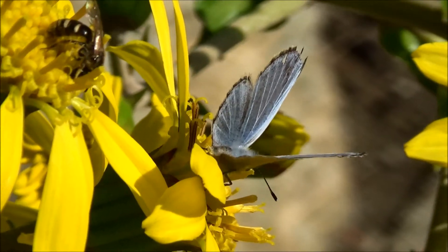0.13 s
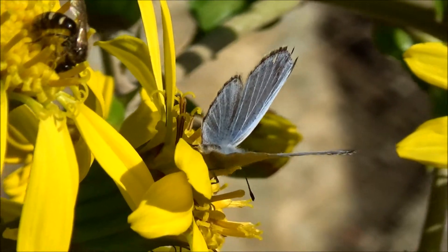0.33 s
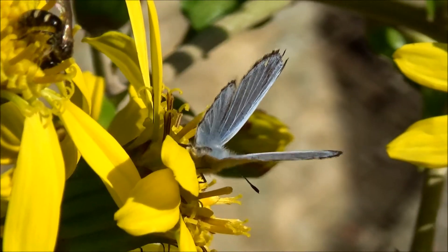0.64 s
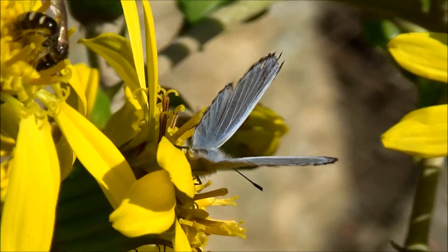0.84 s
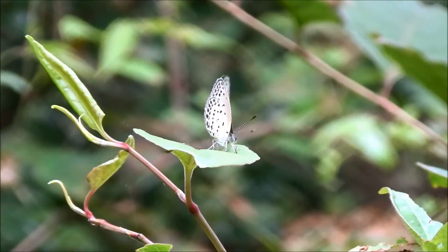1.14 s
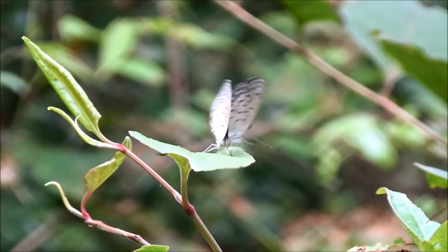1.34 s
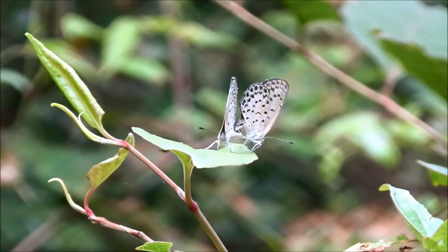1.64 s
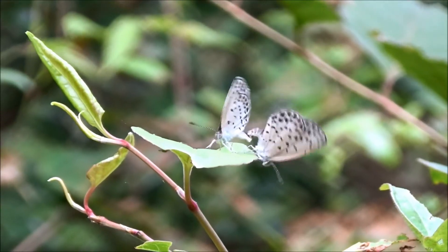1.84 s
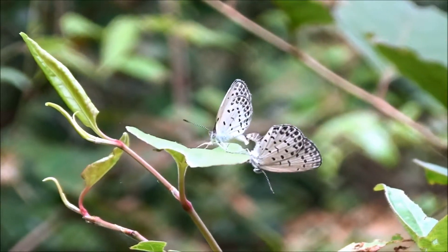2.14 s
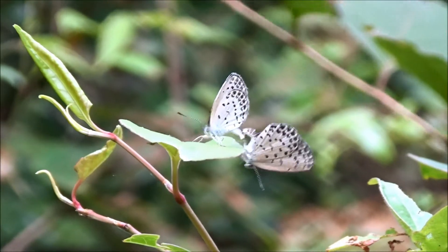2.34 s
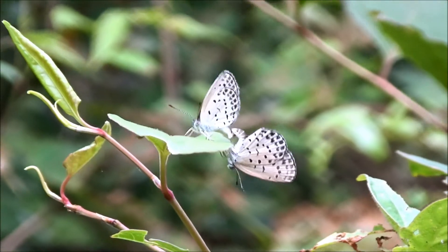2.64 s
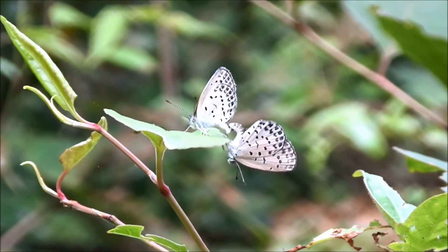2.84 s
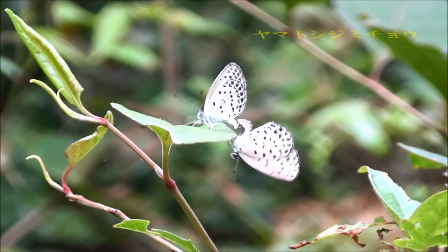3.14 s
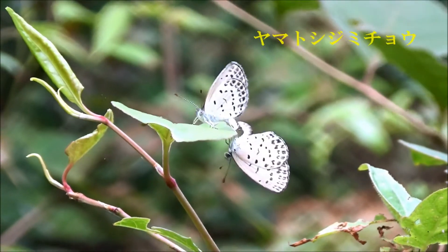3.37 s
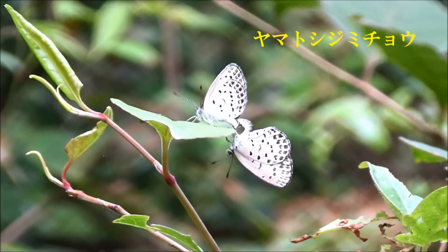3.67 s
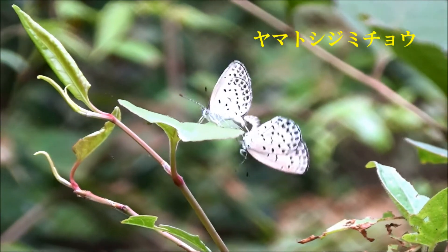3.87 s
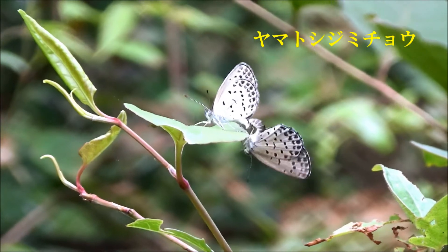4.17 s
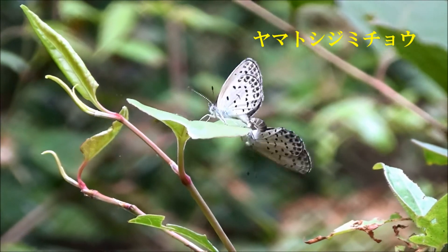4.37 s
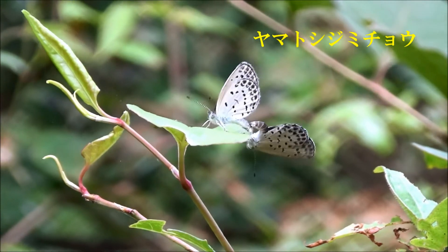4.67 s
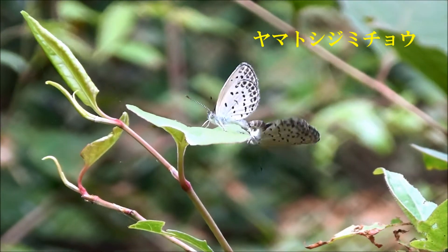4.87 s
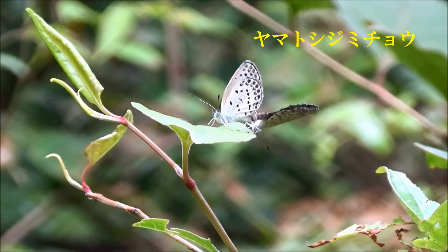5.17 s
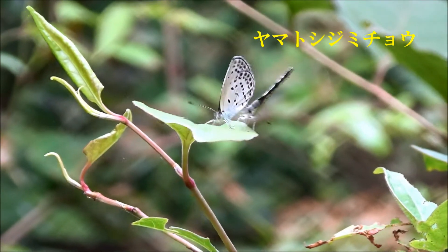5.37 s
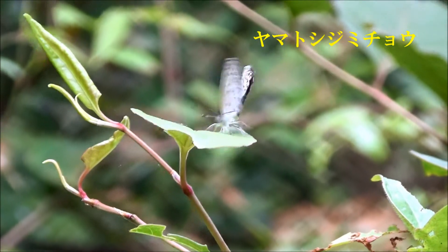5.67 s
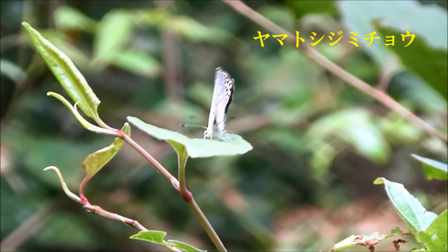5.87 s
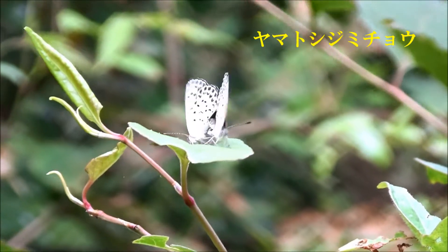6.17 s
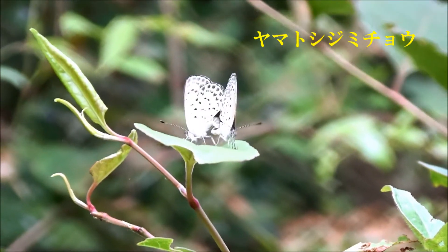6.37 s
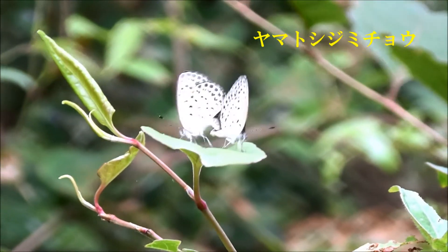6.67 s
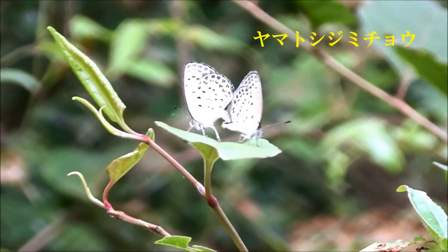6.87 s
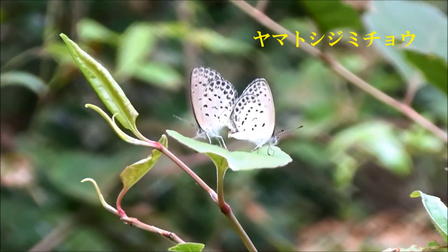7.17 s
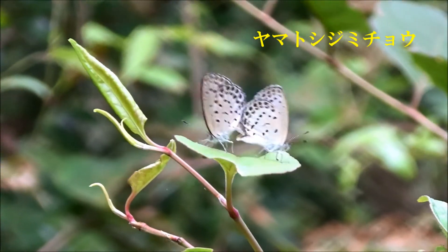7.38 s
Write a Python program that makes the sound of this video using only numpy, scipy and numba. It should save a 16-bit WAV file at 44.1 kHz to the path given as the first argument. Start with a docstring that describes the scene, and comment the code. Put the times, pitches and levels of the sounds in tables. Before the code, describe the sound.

Two natural places joined by a cut. First a soft, distant meadow with traffic hum, crickets, a single close chirp and a tiny bird whistle. Then a woodland insect drone gradually grows, a near cicada buzzing in fast pulses before a steady high chorus. Rumble from passing vehicles lies beneath. Close to the microphone are light regular camera ticks, a hard click near the middle and smaller ticks afterward.

```python
"""Two places outdoors, cut together. It opens on a second of quiet meadow: far traffic as shaped noise, far
crickets as narrow noise, one near cricket as a gliding tone, then a grainy rustle and a far bird's whistle.
A slow fade then opens on a wood: a near cicada throbs, its clicks ringing moving resonances, over a noise band
of far cicadas and the noise of traffic and leaves. At the microphone the camera ticks faintly; two knocks, then
two strong narrow-band ticks, ring its body modes, and the hardest knock pulls the gain control down."""
import sys
import numpy as np
from scipy import signal
from scipy.fft import rfft, irfft, next_fast_len
from scipy.io import wavfile
from scipy.ndimage import uniform_filter1d, minimum_filter1d
from numba import njit

SR = 44100
rng = np.random.default_rng(int(sys.argv[2]) if len(sys.argv) > 2 else 0)


def level_to_linear(level):
    """Convert decibel levels to linear amplitude factors, elementwise."""
    exponent = np.asarray(level, float) / 20
    return 10 ** exponent


def log_audio(samples):
    """Write samples as a 16-bit WAV file to the path given in sys.argv[1]."""
    # one column per channel
    frames = np.atleast_2d(samples).T
    # limit to full scale, then quantise
    limited = np.clip(frames, -1, 1)
    pcm = np.round(limited * 32767).astype(np.int16)
    wavfile.write(sys.argv[1], SR, pcm)


N = 331191
T = np.arange(N) / SR


def curve(table):
    """Columns of a table as signals gliding in time."""
    s, *columns = np.transpose(table)
    return [np.interp(T, s, c) for c in columns]


def held(table):
    """Columns of a table as steps in time."""
    s, *columns = np.transpose(table)
    return [c[np.searchsorted(s, T, side="right") - 1] for c in columns]


def noise():
    """White noise of rms 1."""
    return rng.standard_normal(N)


def level(x, db):
    """Scale to an rms level."""
    return x * level_to_linear(db) / np.sqrt(np.mean(x ** 2))


def colour(x, points):
    """Shape a spectrum by (Hz, dB) points, then set its rms to 1."""
    hz, db = np.transpose(points)
    size = next_fast_len(N)
    f = np.maximum(np.arange(size // 2 + 1) * SR / size, 1)
    weight = level_to_linear(np.interp(np.log(f), np.log(hz), db))
    return level(irfft(rfft(x, size) * weight, size)[:N], 0)


def walk(rate):
    """Random levels held 1 / rate s and slewed twice; spread near 1."""
    k = int(SR / rate)
    steps = np.repeat(rng.standard_normal(N // k + 1), k)
    return 1.3 * uniform_filter1d(uniform_filter1d(steps, k), k)[:N]


def bump(s, length):
    """A smooth Gaussian swell in time."""
    return np.exp(-.5 * ((T - s) / length) ** 2)


def note(s, length, edge):
    """Rise, hold, fall."""
    return np.clip(np.minimum(T - s, s + length - T) / edge, 0, 1)


@njit
def svf(x, hz, width):
    """Band-pass whose centre moves every sample."""
    y, b, l = np.empty(len(x)), 0., 0.
    for i in range(len(x)):
        g, k = np.tan(np.pi * hz[i] / SR), width / hz[i]
        v = (b + g * (x[i] - l)) / (1 + g * (g + k))
        b, l, y[i] = 2 * v - b, l + 2 * g * v, k * v
    return y


def ground_echo(x, db):
    """One inverted early reflection, 2.595 ms late, combs the spectrum."""
    return x - level_to_linear(db) * np.interp(T - .002595, T, x)


# open meadow with far traffic, spectrum at the microphone: freq_hz, density_db (relative, dB per Hz)
MEADOW_SPECTRUM = [(15, -40), (25, -25.5), (152, 0.5), (260, -11.5), (583, -13), (850, -19.5),
                   (1300, -11.5), (2000, -21.5), (3700, -24), (5000, -21.5), (9000, -26), (15600, -28.5)]
MEADOW_DB = -63


def meadow_air():
    """Far traffic rumble over open ground: shaped noise whose level wanders."""
    return colour(noise(), MEADOW_SPECTRUM) * level_to_linear(MEADOW_DB + 1.0 * walk(7.6))


# chirps from across the meadow: start_s, level_db (before the common lift), length_s
FAR_CHIRPS = [(-.02, -75.5, 0.063), (0.073, -76, 0.06513), (.375, -81.5, 0.0274), (0.504, -73.5, .05),
              (0.576, -73.5, .055), (.65, -82.5, .11), (0.853, -79, 0.095)]
FAR_BED_DB, FAR_LIFT_DB = -80.5, 4.112  # the bed too is before the lift


def far_crickets():
    """Distance leaves a narrow noise of wandering pitch: chirps over a steady bed."""
    song = level(svf(noise(), 6050 + 120 * walk(12), 260.), FAR_LIFT_DB)
    chirps = sum(level_to_linear(db) * note(s, length, 0.01307) for s, db, length in FAR_CHIRPS)
    return song * (level_to_linear(FAR_BED_DB) + chirps)


# wing strokes close to the microphone: centre_s, level_db (rms of the tone at the top), spread_s
CRICKET_STROKES = [(.437, -58, 0.000884), (.441, -47.5, 0.001235), (0.451, -39, 0.0037),
                   (.463, -41, 0.004117), (0.478, -50.5, .0025), (0.492, -57, .003)]
# the pitch settles downward through the chirp, echoes die away
CHIRP_S, CHIRP_HZ, CHIRP_DROP_HZ, CHIRP_SETTLE_S = 0.439, 5963.4, 330, .01
ECHO_S, ECHO_DB, ECHO_DB_A_SECOND = .47, -59, -170


def near_cricket():
    """Wing strokes sound a falling tone with a faint octave; scattered echoes blur it into narrow noise."""
    hz = CHIRP_HZ + CHIRP_DROP_HZ * np.exp(-np.maximum(T - CHIRP_S, 0) / CHIRP_SETTLE_S)
    phase = 2 * np.pi * np.cumsum(hz) / SR
    strokes = sum(level_to_linear(db) * bump(s, length) for s, db, length in CRICKET_STROKES)
    chirp = np.sqrt(2) * strokes * (np.sin(phase) + level_to_linear(-35) * np.sin(2 * phase))
    decay = level_to_linear(ECHO_DB + ECHO_DB_A_SECOND * np.abs(T - ECHO_S))
    onset = np.clip((T - ECHO_S) / .012, 0, 1)
    return chirp + level(svf(noise(), hz, 240.0), 0) * decay * onset


RUSTLE_S, RUSTLE_DB, RUSTLE_RISE_S, RUSTLE_FALL_S = 0.47821, -63.5, .02, 0.05  # level before the envelope


def rustle():
    """Noise in grains of uneven strength, rising quickly and dying away."""
    since = np.maximum(T - RUSTLE_S, 0)
    grains = noise() * level_to_linear(2.2 * walk(300))
    shaped = colour(grains, [(700, -34), (1400, -3.0), (2800, 2), (4500, -12), (8000, -40)])
    envelope = 2 * (1 - np.exp(-since / RUSTLE_RISE_S)) * np.exp(-since / RUSTLE_FALL_S)
    return shaped * level_to_linear(RUSTLE_DB) * envelope


# whistled notes from far off: start_s, level_db, length_s; the first slides up to the pitch
BIRD_NOTES = [(.695, -75, 0.0823), (0.767, -72, 0.0592), (.835, -72.5, 0.0746)]
BIRD_HZ, BIRD_SLIDE_HZ, BIRD_SLIDE_S = 3760, 700, .012


def far_bird():
    """A thin whistle: noise through a narrow band at the note's pitch."""
    hz = BIRD_HZ - BIRD_SLIDE_HZ * np.exp(-np.maximum(T - BIRD_NOTES[0][0], 0) / BIRD_SLIDE_S)
    notes = sum(level_to_linear(db) * note(s, length, 0.00925) for s, db, length in BIRD_NOTES)
    return level(svf(noise(), hz, 120.), 0) * notes


# near cicada in the wood: time_s, effort_db, click_rate_hz (mean, tymbal clicks), swing (of the abdomen, 0-1)
SONG = [(1, -2, 306, 0.63), (1.8, -1, 306, 0.4), (2.6, -1, 375, .4), (3.3, -2.5, 298.94, 0.58),
        (4, -.5, 295, 0.84), (4.7, -0.5, 297, 1), (5.4, .5, 265, 1), (6.1, 0, 255, 0.8),
        (6.8, -0.5, 244, 1), (7.5, -1.5, 240, 1)]
# harder squeezes of the abdomen: centre_s, extra_db
ACCENTS = [(1.2, 3), (1.578, 3), (2.021, 2.5), (2.47, 3), (2.968, 3), (3.396, 3.5), (3.853, 3.5),
           (4.28, 2.5), (4.862, 1), (5.47, 1.5), (6.149, 3.5), (6.776, 4.5), (7.418, 2)]
ACCENT_SPREAD_S = 0.032
# one throb: share (of the throb, 0-1), body_hz (before the sweep is scaled), overtone_share (of its top)
SWEEP = [(0, 7300, .99), (.12, 7700, 1.0), (.28, 6500, .99), (.42, 5300, .97), (.7, 6500, .94),
         (.9, 7096, .97), (1, 7300, .99)]
# pace of the abdomen, held until the next row: from_s, throbs_hz
PACE = [(0, 15.6), (2.1, 16.08), (2.5, 15.72), (3.1, 15.33), (3.5, 15.75), (3.9, 16.12), (4.9, 15.83),
        (6.7, 15.55)]
FIRST_THROB_S = 1.081
# cicada's spectrum before the ground echo: freq_hz, density_db (relative, dB per Hz)
VOICE = [(2100, -50), (3900, -14), (4500, -7.5), (5400, -6), (6300, -4), (7200, -9), (8000, -12.5),
         (9200, -42), (9800, -28.5), (10500, -19), (13200, -17), (14600, -10), (15600, -17.5)]
SONG_DB = -40.5  # before effort, accents and the ground echo
# a wide swing silences the falling half of the throb
ONE_SIDED_FROM, ONE_SIDED_AT = 0.49, 0.97
# as the singer tires the overtone sinks and fades
TIRES_FROM_S, TIRES_S, OVERTONE_DB, OVERTONE_LOSS_DB, TOP_HZ, TOP_SAG_HZ = 3.5, 3.8, 0, 16, 14300, 1900


def cicada():
    """Tymbal clicks ring a body resonance and its overtone; each throb of the abdomen sweeps both."""
    effort_db, rate, swing = curve(SONG)
    pace = held(PACE)[0]
    throb = (np.cumsum(pace) / SR - pace[0] * FIRST_THROB_S) % 1
    falling = np.clip((ONE_SIDED_AT - swing) / (ONE_SIDED_AT - ONE_SIDED_FROM), 0, 1)
    tired = np.clip((T - TIRES_FROM_S) / TIRES_S, 0, 1)
    over_db = OVERTONE_DB - OVERTONE_LOSS_DB * tired ** 1.903
    top_hz = TOP_HZ - TOP_SAG_HZ * tired ** 3.2
    share, body_hz, height = np.transpose(SWEEP)
    accent_db = sum(db * bump(s, ACCENT_SPREAD_S) for s, db in ACCENTS)

    # each click is a sharp snap and a short rattle of buckling ribs
    cycles = np.cumsum(rate * (1 + .012 * walk(60))) / SR
    size = level_to_linear(1.4 * noise())[cycles.astype(int)]
    snap = np.exp(600 * (np.cos(2 * np.pi * cycles) - 1))
    rattle = np.exp(0.9273 * np.cos(2 * np.pi * (cycles - .15))) * noise()
    clicks = size * (0.8425 * level(snap, 0) + level(rattle, 0))
    rising = np.exp((0.72 + 0.21 * tired) * (np.cos(2 * np.pi * (throb - .79)) - 1))
    back = np.exp(1.052 * (np.cos(2 * np.pi * (throb - .22)) - 1))

    # the sweep widens with the swing
    centre = 6400 + (0.4464 + 0.17 * swing) * (np.interp(throb, share, body_hz) - 6400)
    body = svf(svf(clicks, centre, 1200.), centre, 1200.0)
    body = body * (2.5 + 2.2 * swing) * (rising + falling * back)

    # the overtone is breathier than the body
    sizzle = .5 * clicks + 1.14 * noise()
    high = np.clip(top_hz * (1 - swing * (1 - np.interp(throb, share, height))), 9000, 16000)
    over = svf(svf(sizzle, high, 5000.), high, 5000.) * (1 + 0.3 * np.cos(2 * np.pi * (throb - .17)))

    # a wide swing drives the body hard enough to sound near its octave
    octave_hz = (1.9 - .12 * tired) * centre
    octave = svf(svf(sizzle, octave_hz, 2600.), octave_hz, 2600.)
    octave = octave * (1.3 - 0.39 * tired) * swing ** 2 * rising

    # a harder squeeze also rings a band just under the top
    squeeze = svf(sizzle, 0.892 * top_hz, 2600.) * .3 * (1 - .5 * tired) * accent_db

    # the unswept rest of the click loses its highest treble as the overtone sinks
    treble_loss = np.clip((15000 - top_hz) / 2000, 0, 1)
    rest = sizzle - treble_loss * svf(sizzle, np.full(N, 15300.), 6000.)
    mix = 0.38 * (1 - 0.68 * tired) * rest + body + octave + 1.4058 * level_to_linear(over_db) * over + squeeze
    voice = colour(mix, VOICE)
    return ground_echo(voice * level_to_linear(SONG_DB + effort_db + accent_db + 0.28 * walk(14)), -4.0)


# cicadas far off in the wood: freq_hz, density_db (relative, dB per Hz)
CHORUS_SPECTRUM = [(2120, -74), (3870, -29), (4250, -18.5), (4600, -12), (5200, -10.5), (6170, -1.5),
                   (6980, -5), (8100, -15), (9300, -29), (9800, -29.5), (10600, -21), (13000, -24.5),
                   (14500, -33), (15600, -43)]
CHORUS_DB, CHORUS_THINS_DB_A_SECOND = -42, 0.46  # level at 2.5 s, before the ground echo


def chorus():
    """Many far cicadas blur into a band of noise that flickers a little and slowly thins."""
    level_db = CHORUS_DB - CHORUS_THINS_DB_A_SECOND * (T - 2.5) + 0.99 * walk(9)
    return ground_echo(colour(noise(), CHORUS_SPECTRUM) * level_to_linear(level_db), -11.5)


# far traffic and leaves around the microphone: freq_hz, density_db (relative, dB per Hz)
WOOD_SPECTRUM = [(15, -48), (25, -15), (134, -7.5), (180, -1), (412, -4.5), (510, -6.5), (660, -11),
                 (750, -1.5), (820, -3.5), (905, 2.5), (1040, -11), (1200, -7.5), (2030, -15.5),
                 (3000, -10.5), (3800, -22), (5200, -40)]
# far vehicles passing: centre_s, swell_db (of the rumble), spread_s
PASSES = [(3.403, 3, 0.34), (5.3, 3.5, 0.3), (6.3, 5.5, .45), (7.3, 1, 0.35)]
WOOD_DB, RUMBLE_HZ, TYRE_SHARE = -56.5, 300, 0.32  # level before the passes


def wood():
    """Far traffic and leaves as shaped noise; a passing vehicle lifts the rumble most, the tyre roar less."""
    air = colour(noise(), WOOD_SPECTRUM)
    low = signal.sosfilt(signal.butter(2, RUMBLE_HZ, fs=SR, output="sos"), air)
    pass_db = sum(db * bump(s, length) for s, db, length in PASSES)
    lifted = low * level_to_linear(pass_db) + (air - low) * level_to_linear(TYRE_SHARE * pass_db)
    return lifted * level_to_linear(WOOD_DB + 1.508 * walk(5.4))


# camera mechanism at the microphone, held until the next row:
# from_s, level_db (mean, before the tick's envelope), pitch_hz (mean)
TICKS = [(0, -54, 3310), (5.55, -56, 3345), (5.93, -46.5, 3164)]
# ticks that stand out: time_s
LOUD_TICKS = [2.285, 2.368, 2.535, 2.744, 2.994, 3.077, 3.119, 3.286, 3.411, 3.702, 3.744, 5.037, 5.204,
              5.495, 6.030, 6.371, 6.447, 6.531, 6.864, 7.030, 7.330]
TICK_RATE_HZ, TICK_START_S, LOUD_TICK_DB = 24000 / 1001, 1.0320, -44  # level before the envelope


def ticks():
    """The mechanism ticks evenly, a short damped sine each time, now and then a stronger one."""
    out = np.zeros(N + 1500)
    tick_db, tick_hz = held(TICKS)
    starts = (np.arange(TICK_START_S, N / SR, 1 / TICK_RATE_HZ) * SR).astype(int)
    chance = rng.standard_normal((len(starts), 2))
    level_db = tick_db[starts] + 1.8 * chance[:, 0]
    loud = np.round((np.array(LOUD_TICKS) - TICK_START_S) * TICK_RATE_HZ).astype(int)
    level_db[loud] = LOUD_TICK_DB
    t = T[:1500]
    envelope = t / 0.0021246 * np.exp(1 - t / 0.0011)
    for i, db, detune in zip(starts, level_db, chance[:, 1]):
        tone = np.sin(2 * np.pi * tick_hz[i] * (1 + 0.018 * detune) * t)
        out[i:][:len(t)] += level_to_linear(db) * tone * envelope
    return out[:N]


# modes of the camera body: freq_hz, weight_db (relative), t60_s
BODY_MODES = [(965, -7, 0.03444), (1426.1, -7, 0.01941), (2133.9, -3, 0.013), (2870, -5, 0.01465),
              (3730, -2.5, 0.013), (4390.5, 3.5, 0.009313), (5476.8, -4.5, 0.00866), (6013, -16, 0.0042),
              (7430, -1.5, 0.0057), (8758, -3.5, 0.00511)]


def ring(centre_hz, octaves):
    """The camera body's modes after an impact that favours one region; peak 1."""
    hz, db, t60 = np.transpose(BODY_MODES)[:, :, None]
    t = T[:1500]
    weight = level_to_linear(db - 5.1 * (np.log2(hz / centre_hz) / octaves) ** 2)
    start_phase = 2.6 * np.arange(len(BODY_MODES))[:, None]
    modes = weight * np.sin(2 * np.pi * hz * t + start_phase) * level_to_linear(-60 * t / t60)
    y = np.sum(modes, axis=0) * (1 - np.exp(-t / 0.00011)) ** 2
    return y / np.max(np.abs(y))


# two knocks on the camera body, then two strong narrow-band ticks of its mechanism:
# start_s, peak_db (before the fade-in, the stereo spread and the gain control), brightest_hz, spread_octaves
IMPACTS = [(1.2804, -21.5, 1900, 1.2), (3.8774, -10, 3900, 1.22), (4.3826, -31, 3373, 0.33),
           (4.8827, -38.5, 3115, 0.3675)]


def camera_impacts():
    """Knocks ring many body modes at once; the strong ticks favour a narrow region of the same modes."""
    out = np.zeros(N)
    for s, db, hz, octaves in IMPACTS:
        out[int(s * SR):][:1500] += level_to_linear(db) * ring(hz, octaves)
    return out


# spectrum of the quiet side signal: freq_hz, weight_db (relative)
SIDE_SPECTRUM = [(25, -5), (300, 1.5), (600, -1), (1200, 3), (2500, 7), (5000, 3.5), (6200, 6.5),
                 (7400, -2), (10000, 10), (15000, -2)]
SIDE_DB, IMPACT_SIDE_DB = -64.5, -19.5  # rms of the side signal; impacts relative to their middle level


def stereo_spread(mid, impacts):
    """A quiet side signal, its sign randomly flipped and its level flickering; impacts lean to the left."""
    flicker = np.sign(walk(30)) * level_to_linear(1.6 * walk(13))
    side = level(colour(mid * flicker, SIDE_SPECTRUM), SIDE_DB) + level_to_linear(IMPACT_SIDE_DB) * impacts
    return np.array([mid + side, mid - side])


CUT_S, AFTER_CUT_DB = 0.95562, -31  # the meadow drops
FADE_START_S, FADE_S = 0.992, 4.46  # the wood replaces it and fades in
WOOD_IN_S, WOOD_START_DB = 1.05, -16  # the wood is held lower until this time


def scene():
    """The meadow, dropping at the cut, then the wood; both nearly the same in each ear."""
    impacts = camera_impacts()
    meadow = meadow_air() + far_crickets() + near_cricket() + rustle() + far_bird()
    first = meadow * np.where(T < CUT_S, 1, level_to_linear(AFTER_CUT_DB)) * (T < FADE_START_S)
    second = cicada() + chorus() + wood() + ticks() + impacts
    second = second * np.where(T < WOOD_IN_S, level_to_linear(WOOD_START_DB), 1) * (T > FADE_START_S)
    return stereo_spread(first + second, impacts)


@njit
def gain_control(peak, top, rise, slew):
    """Its aim drops at once to keep peaks under the top, then creeps back; the gain slews after the aim."""
    out, aim, g = np.empty(len(peak)), 1., 1.
    for i in range(len(peak)):
        aim = min(aim * rise, 1., top / (peak[i] + 1e-9))
        g += slew * (aim - g)
        out[i] = g
    return out


GAIN_TOP, RECOVERY_DB_A_SECOND, LOOK_AHEAD_S = 0.15, 2.5, 0.016354  # top as a share of full scale


def top_cut(x):
    """Nothing passes above the cut-off."""
    return signal.sosfilt(signal.butter(12, 15720, fs=SR, output="sos"), x)


def record(dry):
    """Gain control that looks ahead to the coming peak, then the linear fade into the wood."""
    ahead = int(LOOK_AHEAD_S * SR)
    peak = -minimum_filter1d(-np.max(np.abs(dry), axis=0), size=2 * ahead + 1)
    gain = gain_control(peak, GAIN_TOP, level_to_linear(RECOVERY_DB_A_SECOND / SR), 0.045)
    fade = np.where(T > FADE_START_S, np.clip((T - FADE_START_S) / FADE_S, 0, 1), 1)
    finished = dry * gain * fade
    return top_cut(finished)


dry = scene()
out = record(dry)
log_audio(out)
```